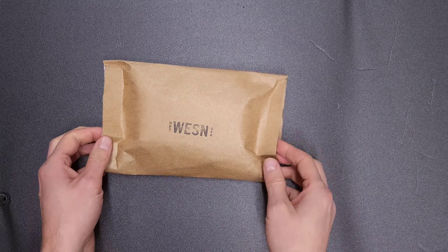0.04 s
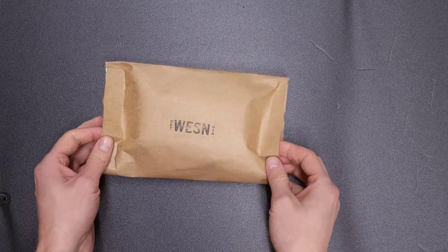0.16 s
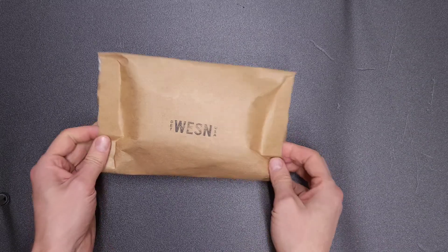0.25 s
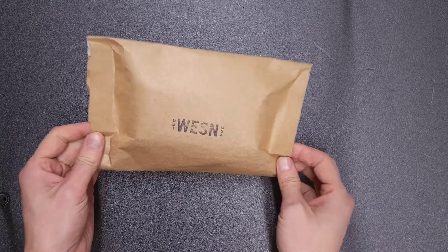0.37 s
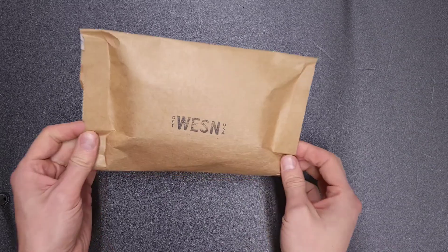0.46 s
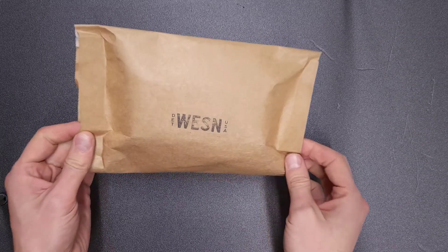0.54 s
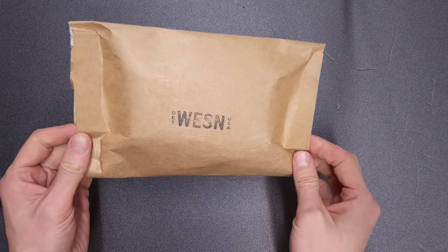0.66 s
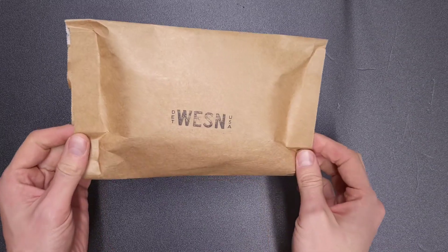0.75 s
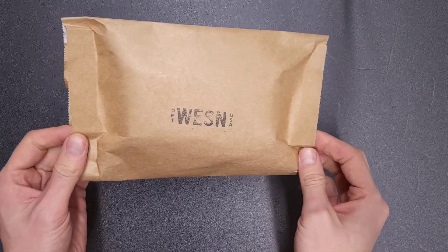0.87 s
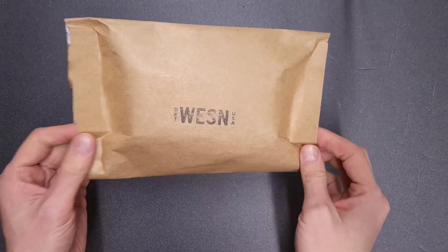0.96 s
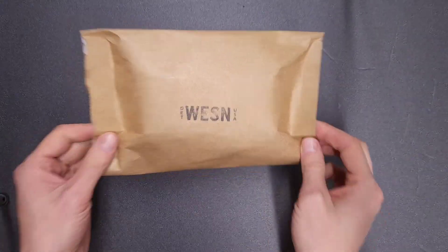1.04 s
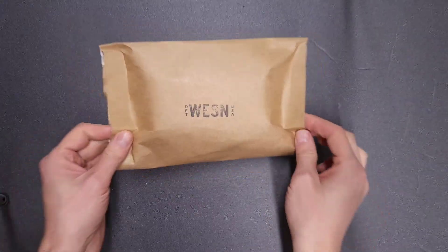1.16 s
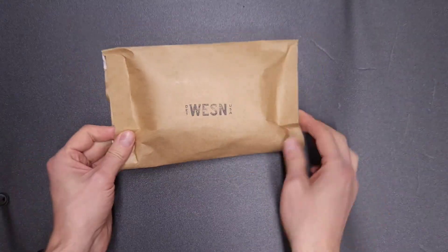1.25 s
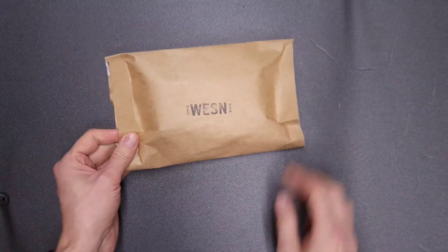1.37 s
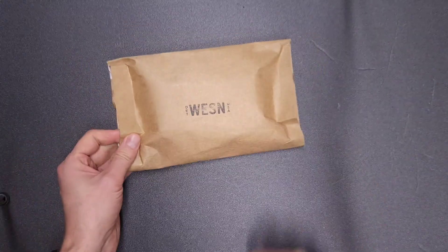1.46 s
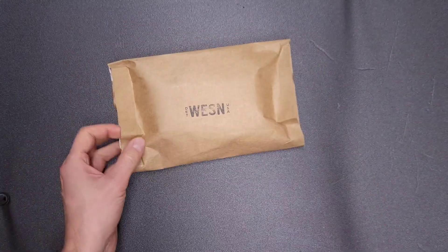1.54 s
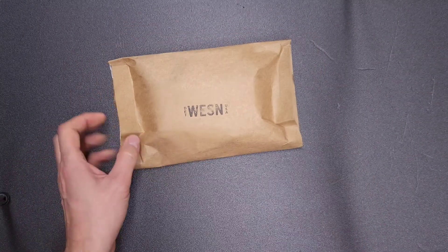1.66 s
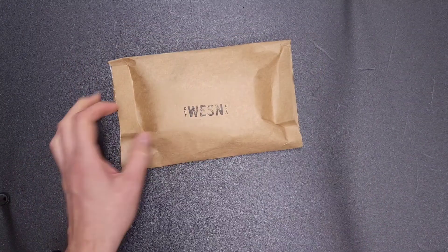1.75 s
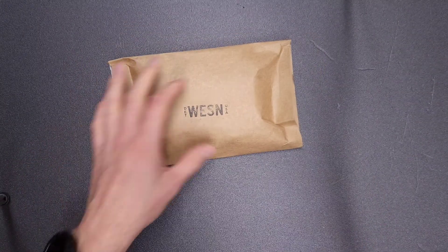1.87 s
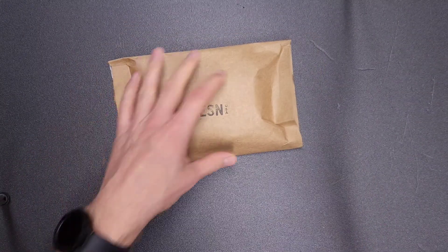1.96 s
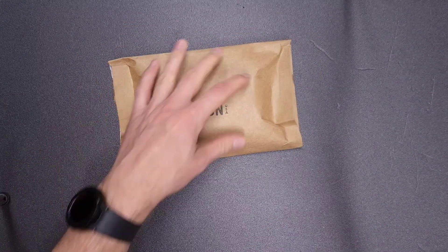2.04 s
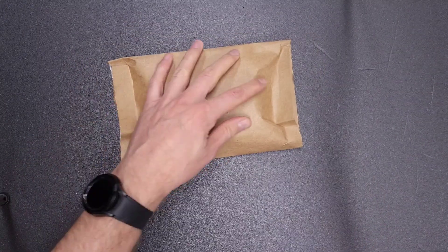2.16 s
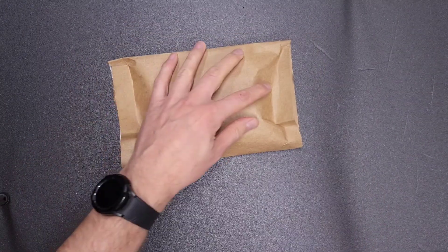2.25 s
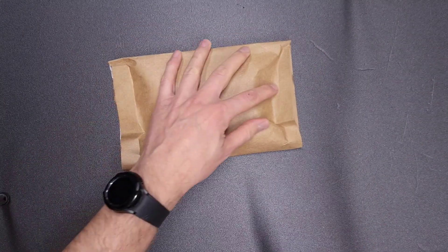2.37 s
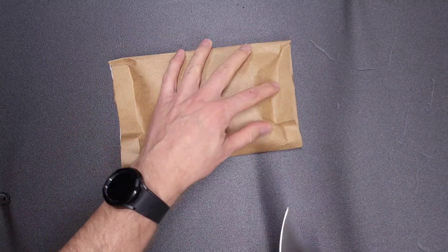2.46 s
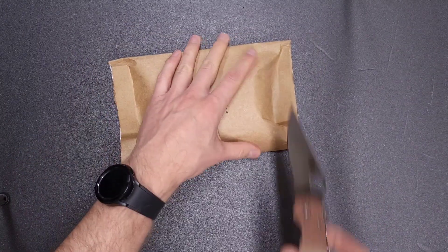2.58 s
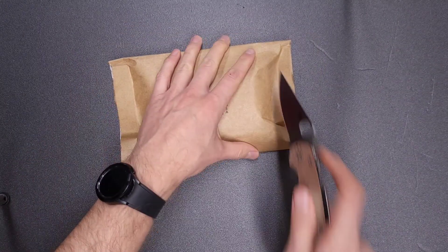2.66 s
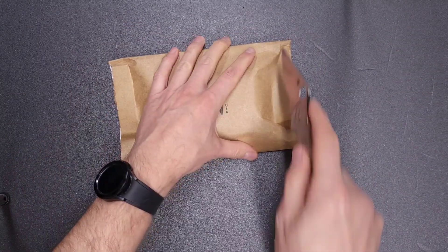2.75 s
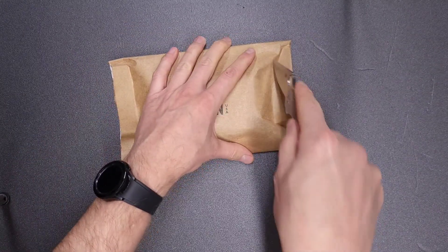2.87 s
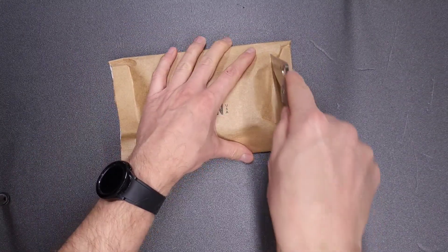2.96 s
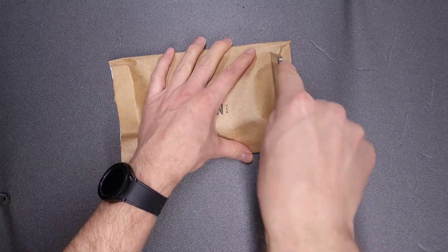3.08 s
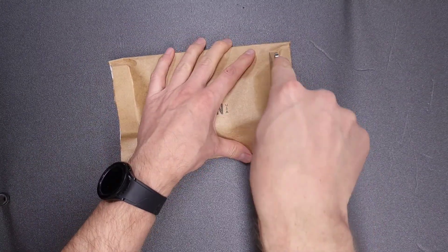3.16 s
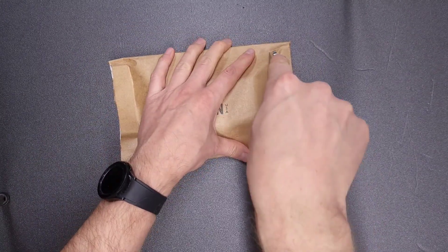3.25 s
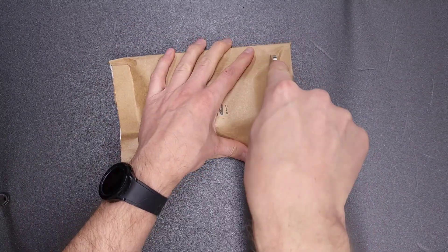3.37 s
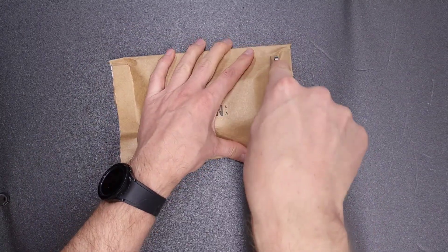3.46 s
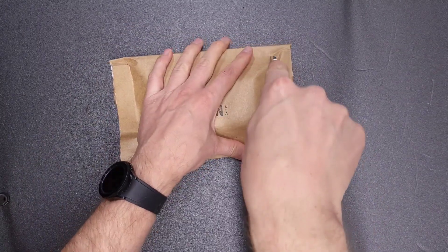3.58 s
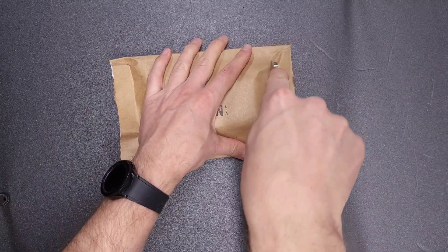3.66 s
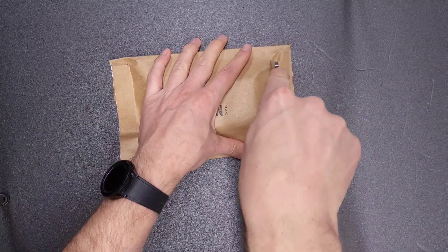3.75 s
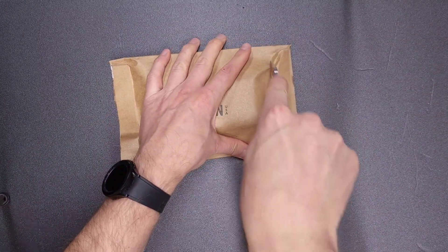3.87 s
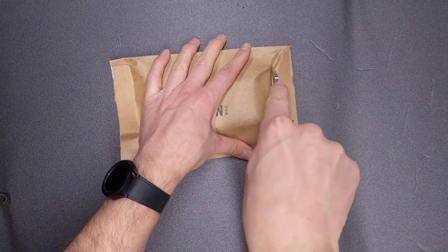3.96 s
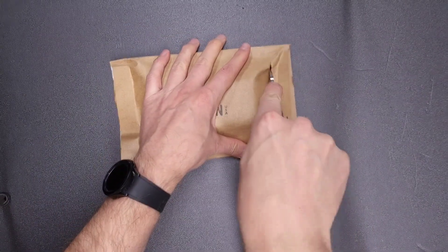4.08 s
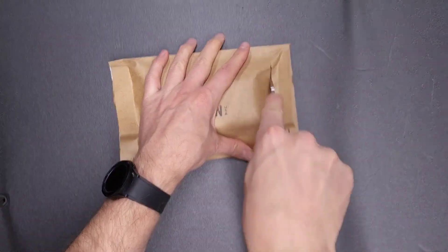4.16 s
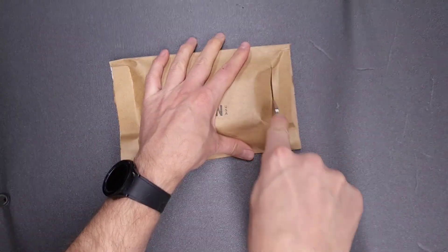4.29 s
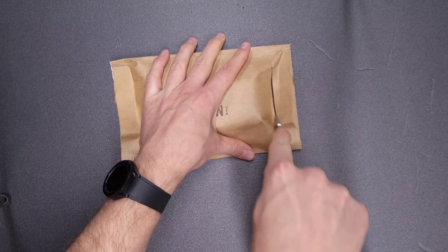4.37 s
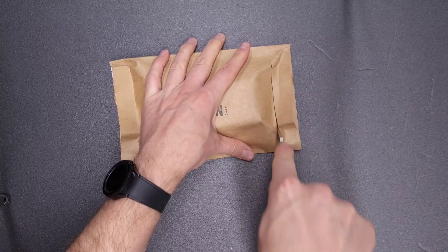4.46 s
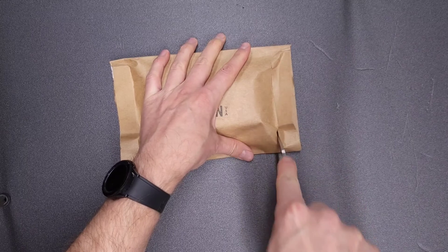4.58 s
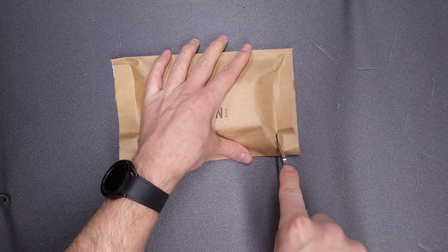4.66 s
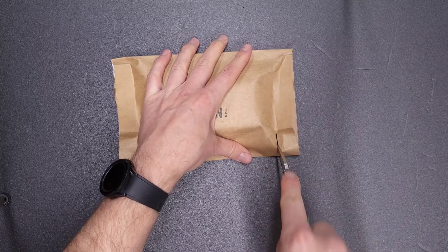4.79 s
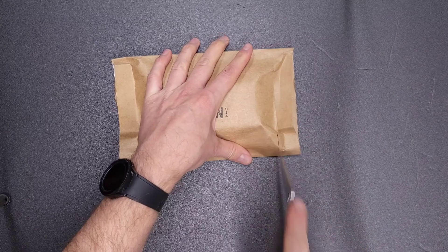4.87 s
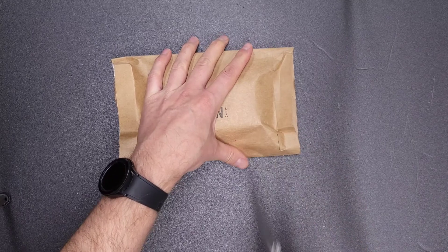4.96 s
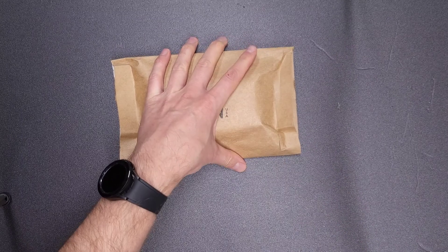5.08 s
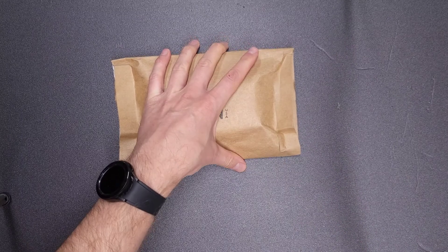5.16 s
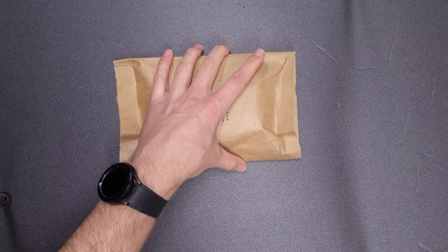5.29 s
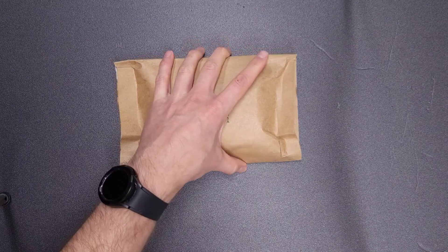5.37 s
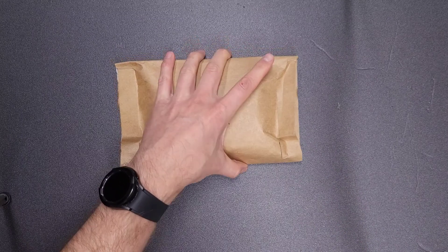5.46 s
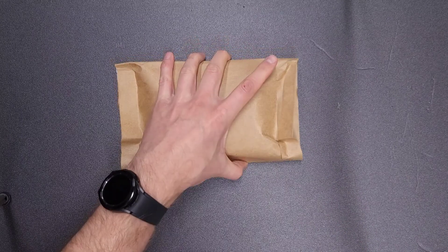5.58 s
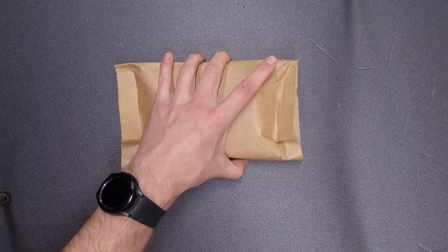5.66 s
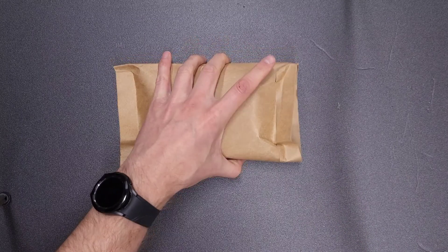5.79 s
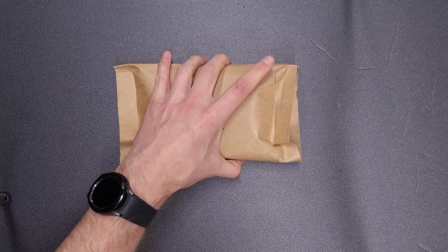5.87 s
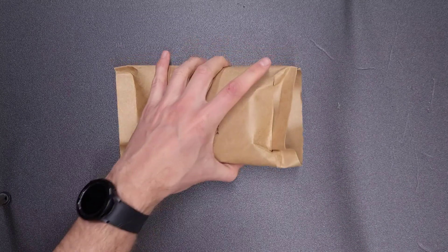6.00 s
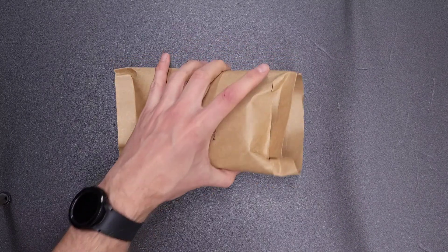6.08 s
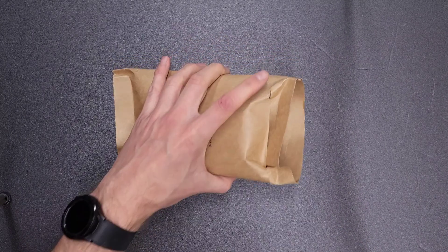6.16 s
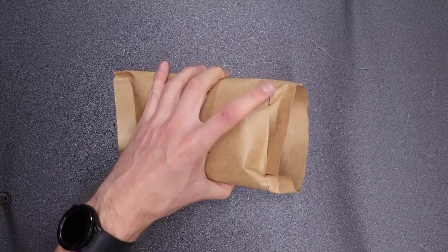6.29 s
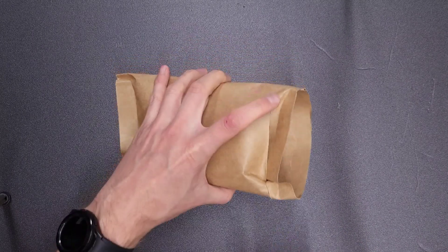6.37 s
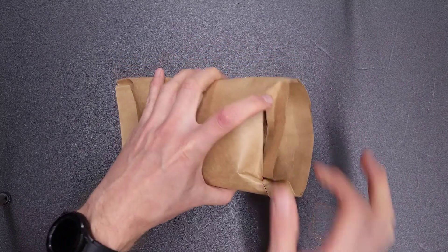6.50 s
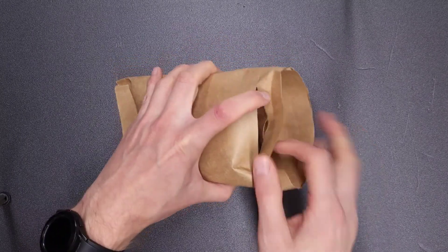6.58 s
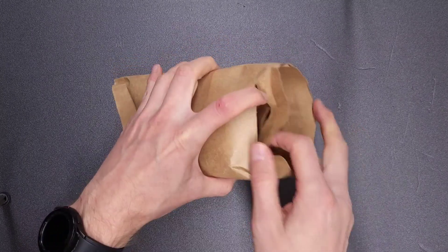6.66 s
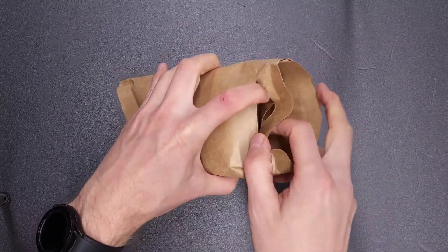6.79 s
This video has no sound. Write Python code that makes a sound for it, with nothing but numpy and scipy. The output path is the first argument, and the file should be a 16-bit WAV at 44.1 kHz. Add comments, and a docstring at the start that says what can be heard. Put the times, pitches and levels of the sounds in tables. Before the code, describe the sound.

A padded kraft-paper mailer is handled very close to stereo microphones in a small, damped room with faint steady air. From 0 to 0.4 s it gives soft crinkles and little ticks, then is almost silent while held until about 1.1 s. Faint brushing resumes, and around 1.65-1.95 s it meets the desk with dull, hollow knocks and a crackle. Hands slide lightly; stiff panels snap at 2.45 and 2.65 s, with more pops, creaks and knocks from 3.2 to 3.9 s. At 4.17 s a knife pierces with a loud double crack and thump, then rasps through fibres until about 4.65 s, bright and gritty over low rumble. Sparse snaps and soft rustles follow from 4.9 to 5.8 s. Near 6.1 s the pouch buckles with a crunchy, hollow thud and fraying fizz; quiet brushing leads to a crisp snap at 6.7 s and a last rustle.

```python
"""A padded kraft-paper mailer in the hands, close to a stereo microphone in a small, damped room.
First it crackles and is held still in the air; from 1.6 s it lies on the desk, pressed flat with knocks and snaps.
At 4.2 s a knife pierces it and parts fibre after fibre along the seam; then it creaks, frays and snaps open.
Panels are short rings and noise bursts, fibres are random slips, the pouch and desk are decaying resonances.
Short reflections and a faint steady room air surround it all."""
import sys
import numpy as np
from scipy import signal
from scipy.fft import rfft, irfft, next_fast_len
from scipy.io import wavfile
from scipy.ndimage import uniform_filter1d

SR = 44100
rng = np.random.default_rng(int(sys.argv[2]) if len(sys.argv) > 2 else 0)


def int16_out(signal):
    """Quantize to a 16-bit WAV file."""
    q = np.round(np.clip(np.atleast_2d(signal).T, -1, 1) * 32767)
    wavfile.write(sys.argv[1], SR, q.astype(np.int16))


N = 301203  # samples in the scene

# Levels in the tables are relative: the functions that play them and the mix apply further gains.


def undb(db):
    """Decibels to gain."""
    return 10 ** (np.asarray(db) / 20)


def unit(x):
    """Scale to rms 1."""
    return x / np.sqrt(np.mean(x ** 2) + 1e-20)


def band(x, lo_hz, hi_hz, order=2):
    """Causal band-pass."""
    edges = [lo_hz, min(hi_hz, .48 * SR)]
    return signal.sosfilt(signal.butter(order, edges, "band", fs=SR, output="sos"), x)


def colour(x, points):
    """Shape the spectrum by (freq_hz, level_db) points, joined over log frequency."""
    hz, db = np.transpose(points)
    size = next_fast_len(x.shape[-1])
    bins_hz = np.maximum(np.arange(size // 2 + 1) * SR / size, 1)
    gain = undb(np.interp(np.log(bins_hz), np.log(hz), db))
    return irfft(rfft(x, size) * gain, size)[..., :x.shape[-1]]


def spread(three, likeness):
    """Left and right from one shared and two separate signals."""
    likeness = np.clip(likeness, 0, 1)
    return np.sqrt(likeness) * three[0] + np.sqrt(1 - likeness) * three[1:]


def noise(size, likeness):
    """Stereo white noise; likeness 1 is mono, 0 is two unrelated sides."""
    return spread(rng.standard_normal((3, size)), likeness)


def walk(rate):
    """A smooth random wander of rms 1, with about this many new values per second."""
    step = int(SR / rate)
    stairs = np.repeat(rng.standard_normal(N // step + 1), step)
    return unit(uniform_filter1d(stairs, step)[:N])


def fibres(rate, scatter_db, likeness):
    """Tiny slips at random moments, rate per second, a few much larger than the rest."""
    slips = rng.random(N) < rate / SR
    sizes = undb(scatter_db * np.minimum(rng.exponential(size=N), 5))
    return unit(noise(N, likeness) * slips * sizes)


def add(track, s, sound):
    """Mix a sound into the track at time s."""
    start = max(int(s * SR), 0)
    track[:, start:start + sound.shape[-1]] += sound[:, :N - start]


def during(span, fade_s=0.079):
    """1 inside a span of time, 0 outside, with soft edges."""
    t = np.arange(N) / SR
    return np.clip(np.minimum(t - span[0], span[1] - t) / fade_s, 0, 1)


def flurry(s, rise, fall):
    """An envelope that grows to 1 at time s and dies away."""
    t = np.arange(N) / SR
    return np.exp(-np.minimum(np.maximum((s - t) / rise, (t - s) / fall), 20))


def bell(s, length, roundness=1.92):
    """An envelope that swells to 1 at time s and dies the same way; roundness 1 is pointed, 2 is round."""
    t = np.arange(N) / SR
    return np.exp(-np.minimum(np.abs(2 * (t - s) / length) ** roundness, 20))


def wander(grain, depth=0.51, count=9):
    """As the contact travels, resonances of the sheet come and go."""
    centres_hz = np.geomspace(650, 11000, count)
    return grain + sum(depth * walk(32) * band(grain, hz / 1.05, hz * 1.005, order=1) for hz in centres_hz)


def friction(face, hiss, grain):
    """Slips drive the paper face and, above it, its hissing fibres; the contact catches and lets go unevenly."""
    split_hz, catch_db, flicker_db = 2500, .9, 1.1
    low = unit(band(grain, 64, split_hz, order=4))
    high = unit(band(grain, split_hz, SR / 2, order=4))
    sound = face * low * undb(flicker_db * walk(50)) + hiss * high * undb(flicker_db * walk(50))
    return sound * undb(catch_db * walk(200))


def judder(lowest_hz=45, highest_hz=100):
    """Uneven rumble of the desk under anything that drags across the mailer."""
    shake, uneven = noise(N, .6), undb(2.5 * walk(25))
    return unit(band(shake, lowest_hz, highest_hz) * uneven)


# A stiff panel buckles: start_s, flip_s, pitch_hz, panel_db, crack_db, fibre_tick_db
PANEL_SNAPS = [(0.16, .0022, 1170, -38.5, -47.5, -51), (0.3951, .0002, 1230, -56, -44.5, -39),
               (1.4646, 0.0011, 950, -37, -73, -71), (1.633, 0.0019, 1300, -49.5, -65, -62),
               (1.667, 0.0016, 1350, -51, -43, -53), (1.829, 0.0018, 1150, -44.5, -60, -76),
               (2.22, 0.00052, 1300, -57, -57, -53.5), (2.451, 0.00098, 900, -25.5, -31.5, -47),
               (2.6584, 0.00056, 965, -23.5, -35.5, -36), (2.783, 0.00044, 825, -43.5, -76, -70),
               (2.9401, 0.00028, 800, -42.5, -70, -76), (3.1692, 0.00093, 1150, -35.5, -57, -74),
               (3.295, 0.00058, 1350, -38.5, -43, -39.5), (3.4007, 0.00098, 1220, -32, -41, -49.5),
               (3.696, 0.00037, 1290, -32.5, -51, -63), (3.7617, 0.00073, 760, -31.5, -39, -66),
               (3.921, .0008, 810, -55, -63, -70), (4.143, 0.00082, 1490, -54, -55, -55),
               (4.157, 0.00028, 1330, -37, -42, -41), (4.1746, 0.00032, 2020, -18.5, -20, -23),
               (4.1926, 0.00043, 1830, -20, -19, -30), (4.503, 0.0011, 1400, -35.5, -36, -35.5),
               (4.5241, 0.00038, 1370, -31.5, -29.5, -30.5), (4.9215, .0013, 1000, -46, -50, -65),
               (4.944, .0013, 1400, -50, -57, -70), (4.9603, 0.00075, 880, -34.5, -44, -56),
               (5.105, 0.00076, 1250, -32.5, -47, -48), (5.1137, 0.00029, 1180, -35.5, -52, -63),
               (5.257, .001, 1047, -41.5, -55, -67.5), (5.3004, 0.0011, 1940, -25.5, -35, -49),
               (5.3322, .0008, 860, -34, -45.5, -59.5), (5.464, 0.0034, 893, -51.5, -70, -80),
               (5.494, 0.0012, 1020, -48, -69.5, -80), (5.6815, 0.00067, 1180, -46, -47.5, -42),
               (5.8313, 0.001, 1370, -35.5, -40, -47.5), (5.906, 0.0012, 2070, -63, -46.5, -41),
               (6.018, 0.00079, 810, -46, -80, -76), (6.068, 0.0015, 1440, -34.5, -46, -56),
               (6.0934, 0.0018, 1470, -31.5, -29.5, -49), (6.479, .001, 1380, -36.5, -43.5, -61),
               (6.707, 0.0011, 1790, -23, -23.5, -26)]
# The ring's decay outlasts the flip by this many cycles; body level follows the panel about a typical one.
RING_CYCLES, SNAP_TYPICAL_DB = 0.46, -33.5


def snaps(body_db=-50, body_share=0.53, crack_trim_db=-1.0, likeness=0.47,
          settle_db=-6, settle_s=0.017, pan_db=1.5):
    """A panel flips through: it rings at its own pitch, its fold cracks, the sheet settles."""
    out, t = np.zeros((2, N)), np.arange(int(SR / 10)) / SR
    ring_share = .5
    window = SR / 100  # each level is the rms of the burst's energy packed into 10 ms
    pan = undb([[pan_db / 2], [-pan_db / 2]])  # the flip leans left
    for s, flip_s, hz, panel_db, crack_db, tick_db in PANEL_SNAPS:
        rise = 1 - np.exp(-(t / flip_s) ** 2)
        settle = noise(len(t), 0.23) * rise * np.exp(-t / settle_s)
        push = unit(noise(len(t), likeness) * rise * np.exp(-t / flip_s))
        push = push + undb(settle_db) * unit(settle)
        # the two sides hear the ring at different phases
        phase = rng.uniform(-0.52, 1.0) * np.array([[1], [-1]])
        ring = np.sin(2 * np.pi * hz * t + phase) * rise * np.exp(-t / (flip_s + RING_CYCLES / hz))
        rasp = unit(band(push, 606, hz * 1.58, order=3))
        flip = (ring_share * unit(ring) + (1 - ring_share) * rasp) * pan
        tick = unit(band(push, 5500, 7800)) + 0.56 * unit(band(push, 8700, 15000))
        parts = [(band(push, 235, 640, order=3), body_db + body_share * (panel_db - SNAP_TYPICAL_DB)),
                 (band(flip, 500, 2910, order=4), panel_db),
                 (band(push, 2040, 3930, order=3), crack_db + crack_trim_db),
                 (tick, tick_db)]
        snap = sum(unit(part) * undb(db) for part, db in parts)
        add(out, s, snap * np.sqrt(window / len(t)))
    return out


# A crease gives way in a flurry, or at 4.18-4.21 s the knife's point bursts through: peak_s, rise_s, fall_s,
# level_db, treble_minus_level_db
CREASE_CRUNCHES = [(0.035, 0.018, 0.01, -48, -8), (0.293, 0.0056, 0.0053, -40.5, -7),
                   (1.94, 0.0032, 0.018, -33.5, 1), (2.676, 0.044, 0.038, -43, -10),
                   (3.031, 0.0012, 0.029, -39.5, -7.5), (3.224, 0.004, 0.02, -40.5, -7.5),
                   (3.772, 0.035, 0.019, -37.5, -5), (4.184, 0.009, 0.017, -21.5, -2.5),
                   (4.208, 0.0085, 0.0045, -23.5, -0.5), (6.097, 0.011, 0.033, -29.5, -13.5),
                   (6.717, 0.007, 0.025, -29, -9)]


def crunches(lowest_hz=450):
    """Flurries of fibre slips swell and die as a crease rolls through the paper or the knife's point bursts
    through it."""
    grain = colour(fibres(rate=9000, scatter_db=1.6, likeness=0.25), FIBRE_COLOUR)
    face = unit(band(grain, lowest_hz, 3400, order=4))
    treble = unit(band(grain, 3000, 11000))
    dull, bright = np.zeros(N), np.zeros(N)
    for s, rise, fall, db, treble_db in CREASE_CRUNCHES:
        swell = undb(db) * flurry(s, rise, fall)
        dull = dull + swell
        bright = bright + swell * undb(treble_db)
    return dull * face + bright * treble


# The knife runs along the seam, level by level: time_s, paper_face_db, fibre_hiss_db
KNIFE_PATH = [(4.24, -37, -37), (4.3, -42, -37), (4.385, -41, -41.5), (4.456, -34, -34.5),
              (4.494, -40.5, -45), (4.522, -34.5, -34), (4.582, -35, -36.5), (4.64, -58, -52.5),
              (4.687, -48.5, -42), (4.826, -69, -69), (4.85, -91, -91)]
# Colour of parting fibres, shared with the crunches: freq_hz, level_db
FIBRE_COLOUR = [(60, 1.5), (150, -19.5), (350, -4), (800, 0), (1300, 3.5), (1700, 3), (2400, 1.5),
                (4900, -4), (6200, -0.5), (8700, -11), (15000, -7.5)]
# The point goes through the paper, and the edge takes this long to bite.
PIERCE_S, BITE_S = 4.17, 0.03


def cut(hiss_trim_db=3, rumble_db=-5, ease_s=0.32):
    """The edge parts fibre after fibre; its drag shakes the desk, less as the hand eases off."""
    slips = fibres(rate=2600, scatter_db=1.5, likeness=0.14)
    grain = wander(colour(slips, FIBRE_COLOUR))
    t = np.arange(N) / SR
    s, face_db, hiss_db = np.transpose(KNIFE_PATH)
    since = np.maximum(t - PIERCE_S, 0)
    snags = undb(1.4 * walk(55))
    bite = np.minimum(since / BITE_S, 1) * snags
    # silent after the last row
    drag = bite * undb(np.interp(t, s, face_db, right=-np.inf))
    hiss = bite * undb(np.interp(t, s, hiss_db, right=-np.inf))
    rumble = undb(rumble_db) * drag * np.exp(-since / ease_s) * judder()
    return friction(drag, hiss * undb(hiss_trim_db), grain) + rumble


# Frayed fibres part with a high fizz: peak_s, rise_s, fall_s, level_db
FIBRE_FRAYS = [(4.445, 0.042, 0.022, -31.5), (5.906, 0.0018, 0.032, -43.5), (6.085, 0.0017, 0.017, -41.5),
               (6.124, 0.0019, 0.014, -38.5), (6.41, 0.052, 0.095, -54)]


def frays(lowest_hz=7000, highest_hz=17000):
    """The finest fibres along the slit give way, far brighter than the sheet."""
    fizz = unit(band(fibres(rate=2900, scatter_db=1.5, likeness=0.13), lowest_hz, highest_hz))
    return fizz * sum(undb(db) * flurry(s, rise, fall) for s, rise, fall, db in FIBRE_FRAYS)


# Skin or blade strokes the paper: fastest_s, length_s, paper_face_db, hiss_minus_face_db
PAPER_STROKES = [(0.22, 0.46, -58, -6), (0.284, 0.057, -56.5, 0.5), (0.394, 0.13, -52.5, -8.5),
                 (0.713, 0.24, -71.5, -12), (0.913, 0.055, -72, -9), (1.127, 0.064, -53, 0),
                 (1.293, 0.077, -58.5, 1), (1.404, 0.061, -45.5, -10), (1.684, 0.11, -53, 2.5),
                 (1.776, 0.058, -44, 5), (1.873, 0.045, -49, -5), (2.06, 0.29, -61.5, -1.5),
                 (2.332, 0.24, -63.5, 9), (2.485, 0.16, -52.5, 0.5), (2.662, 0.12, -56.5, 12),
                 (2.893, 0.33, -59.5, 2.5), (3.129, 0.052, -49, -1.5), (3.277, 0.18, -61.5, 3.5),
                 (3.478, 0.064, -49, 0), (4.042, 0.061, -47.5, 2.5), (4.912, 0.059, -52, 13.5),
                 (5.034, 0.28, -61, 0), (5.329, 0.15, -58, 0.5), (5.652, 0.87, -63.5, -7.5),
                 (5.935, 0.31, -59, -0.5), (6.418, 0.27, -56, -3.5), (6.573, 0.12, -52, -0.5),
                 (6.673, 0.058, -47, 2.5), (6.785, 0.13, -52, 3.5)]
# Colour of sliding on paper: freq_hz, level_db
SLIDING_COLOUR = [(200, -15.5), (520, -5), (700, -2.5), (1230, -0.5), (1700, -7.5), (3300, -11.5),
                  (4900, -11), (6300, -10), (7700, -13), (8700, -20.5), (15000, -17)]
# The mailer is held still in the air: from_s, to_s; at all other times the hands creep faintly over it.
HELD_STILL = (0.4, 1.098)
CREEP_DB, CREEP_HISS_DB = -69, -72.5
SET_DOWN_S = 1.62  # from here on the mailer lies on the desk


def slides(level_db=-1, crackle_db=-8, rumble_db=-13):
    """Skin and the flat of the blade brush the paper in fine, dense slips, with small dull crackles among them."""
    slips = unit(colour(fibres(rate=14000, scatter_db=2.0, likeness=0.15), SLIDING_COLOUR))
    crackles = unit(band(fibres(rate=320, scatter_db=0.7, likeness=0.5), 700, 3400, order=3))
    grain = wander(slips + undb(crackle_db) * crackles)
    moving = 1 - during(HELD_STILL)
    on_desk = np.arange(N) / SR > SET_DOWN_S
    face, hiss = moving * undb(CREEP_DB), moving * undb(CREEP_HISS_DB)
    for s, length, db, hiss_db in PAPER_STROKES:
        swell = undb(db) * bell(s, length)
        face = np.hypot(face, swell)
        hiss = np.hypot(hiss, swell * undb(hiss_db))
    rumble = undb(rumble_db) * face * on_desk * judder()
    return undb(level_db) * friction(face, hiss, grain) + rumble


# A fingertip or the blade drags and one panel creaks: peak_s, length_s, pitch_hz, level_db
PANEL_CREAKS = [(0.032, 0.024, 1200, -51.5), (0.182, 0.058, 697, -52.5), (0.289, 0.021, 726, -42.5),
                (0.743, 0.1, 1200, -67), (1.13, 0.098, 1045, -55), (2.688, 0.069, 905, -43),
                (3.23, 0.024, 1950, -46.5), (4.045, 0.029, 6500, -43), (4.29, .06, 6430, -39),
                (4.557, 0.038, 1380, -37.5), (4.698, 0.05, 1250, -47), (4.889, 0.024, 1020, -48.5),
                (4.935, 0.047, 6140, -50), (5.948, 0.089, 720, -57.5)]


def creaks():
    """Quick slips feed one narrow resonance of the sheet."""
    slips, width = fibres(rate=4000, scatter_db=1.0, likeness=.7), 1.16
    out = 0
    for s, length, hz, db in PANEL_CREAKS:
        tone = unit(band(slips, hz / width, hz * width, order=3))
        out = out + undb(db) * bell(s, length) * tone
    return out


# The air pocket and its stiff walls ring: freq_hz, level_db, decay_s
POUCH_RESONANCES = [(199.4, 4.5, 0.012), (349, 6, 0.0077), (686.5, -1.5, 0.0056), (878, -6, 0.012),
                    (1243, -5, 0.0046), (2300, -29, 0.014)]


def pouch(x):
    """Whatever moves the paper also rings the hollow mailer."""
    t = np.arange(int(SR / 10)) / SR
    response = 0
    for hz, db, decay in POUCH_RESONANCES:
        gain = undb(db) * 2 / (decay * SR)  # keeps the peak gain independent of decay
        response = response + gain * np.cos(2 * np.pi * hz * t) * np.exp(-t / decay)
    return x + signal.fftconvolve(x, response[None], axes=1)[:, :N]


# The padded mailer bumps the desk: start_s, pouch_db, pouch_pitch_hz, decay_s, desk_db
DESK_BUMPS = [(1.669, -44.5, 189, 0.017, -56), (1.829, -21, 373, 0.0071, -75),
              (1.831, -30.5, 190.5, 0.026, -51), (1.939, -36, 363, 0.01, -51), (3.271, -43, 85, .015, -54),
              (3.697, -23, 336, 0.0046, -60), (3.764, -37.5, 358, 0.018, -81),
              (3.921, -35.5, 349, 0.0071, -66.5), (4.176, -20, 340, 0.011, -31),
              (4.193, -27, 197, .019, -50), (6.07, -22, 430, 0.01, -62), (6.093, -31, 401, 0.019, -42.5)]
# The desk top rings: freq_hz, level_db, decay_s
DESK_RESONANCES = [(58, 4, 0.0526), (96.8, -7, 0.045), (152.3, 0.5, 0.03), (236.4, 1.5, 0.033)]


def bumps(width=0.5, scuff_db=-7):
    """The air-filled pouch gives a hollow knock with a little scuff and sets the desk top ringing."""
    out, t = np.zeros((2, N)), np.arange(int(SR / 2)) / SR
    desk = sum(undb(db) * np.sin(2 * np.pi * hz * t) * np.exp(-t / decay) for hz, db, decay in DESK_RESONANCES)
    desk = desk * (1 - np.exp(-t / 0.0056))  # soft onset
    for s, db, hz, decay, desk_db in DESK_BUMPS:
        fade = np.exp(-t / decay) * (1 - np.exp(-t * hz))
        knock = np.sin(2 * np.pi * hz * t) * fade
        scuff = unit(band(noise(len(t), 0.18) * fade, hz / (1 + width), hz * (1 + width))) * np.std(knock)
        add(out, s, (knock + undb(scuff_db) * scuff) * undb(db) + desk * undb(desk_db))
    return out


# The pouch flexes and its padding rumples: peak_s, rise_s, fall_s, level_db, desk_rumble_db
POUCH_HEAVES = [(2.06, 0.051, 0.099, -54, -62), (2.69, 0.024, .032, -41, -70),
                (3.05, .012, 0.019, -55, -58), (3.235, .02, .07, -54, -59),
                (3.735, 0.031, 0.077, -48.5, -73), (4.189, 0.0092, 0.037, -33.5, -33),
                (4.335, 0.048, 0.041, -44, -38), (5.926, 0.0064, 0.056, -45.5, -50.5),
                (6.04, .004, 0.01, -51, -68), (6.1, 0.015, 0.032, -32, -47.5),
                (6.163, 0.018, 0.023, -56, -44), (6.714, .005, 0.023, -44, -54)]


def heaves(lowest_hz=250, highest_hz=600):
    """The whole pouch bulges: a dense, dull rumpling over the rumble of the desk."""
    rumple = unit(band(fibres(rate=900, scatter_db=1.0, likeness=0.47), lowest_hz, highest_hz))
    rumble = judder()
    return sum(flurry(s, rise, fall) * (undb(db) * rumple + undb(desk_db) * rumble)
               for s, rise, fall, db, desk_db in POUCH_HEAVES)


# Colour of the room's reflections: freq_hz, level_db
REFLECTION_COLOUR = [(100, 4.5), (500, -3.5), (5000, 2.5), (15000, 0)]


def room(x, near_db=-8, near_t60=0.036, far_db=-10, far_t60=0.15):
    """Quick reflections from desk and hands, then the short tail of the walls, as decaying noise (t60 in s)."""
    t = np.arange(int(SR / 2)) / SR
    echo = 0
    for db, t60, delay_s in [(near_db, near_t60, .002), (far_db, far_t60, .006)]:
        decay = np.exp(-np.log(1000) * t / t60)
        tail = noise(len(t), 0.029) * decay * np.clip(t / delay_s - 1, 0, 1)
        echo = echo + undb(db) * unit(tail) / np.sqrt(len(t))
    return signal.fftconvolve(x, colour(echo, REFLECTION_COLOUR), axes=1)[:, :N]


# Colour of the quiet room: freq_hz, level_db (per hertz)
AIR_COLOUR = [(30, -4.5), (60, -5), (400, -10.5), (3000, -36.5), (16000, -55)]


def room_air(level_db=-74.5):
    """Faint steady air of the room: coloured stereo noise."""
    return unit(colour(noise(N, 0.7), AIR_COLOUR)) * undb(level_db)


def scene(paper_db=-1, thud_room_db=-7):
    """All the paper sounds in the room, over its faint steady air; the dull thuds stay drier."""
    sheet = snaps() + crunches() + cut() + frays() + slides() + creaks()
    paper = pouch(sheet) * undb(paper_db)
    thuds = bumps() + heaves()
    return paper + thuds + room(paper + undb(thud_room_db) * thuds) + room_air()


def record(dry, top_hz=16000):
    """The recorder cuts the very top with a steep low-pass."""
    return signal.sosfilt(signal.ellip(10, .2, 80, top_hz, fs=SR, output="sos"), dry)


dry = scene()
out = record(dry)
int16_out(out)
```